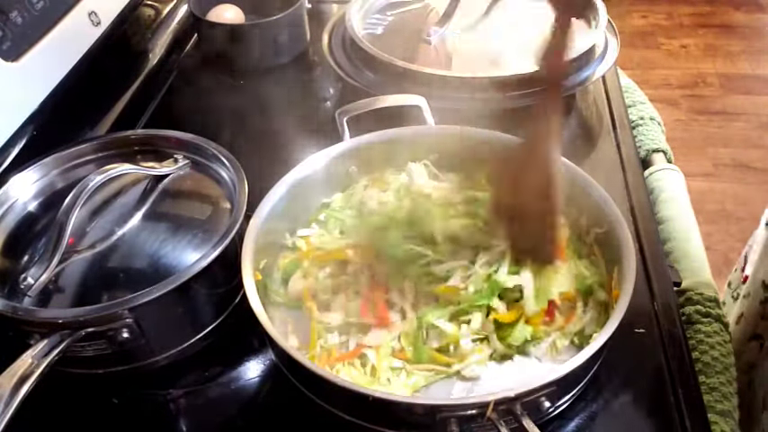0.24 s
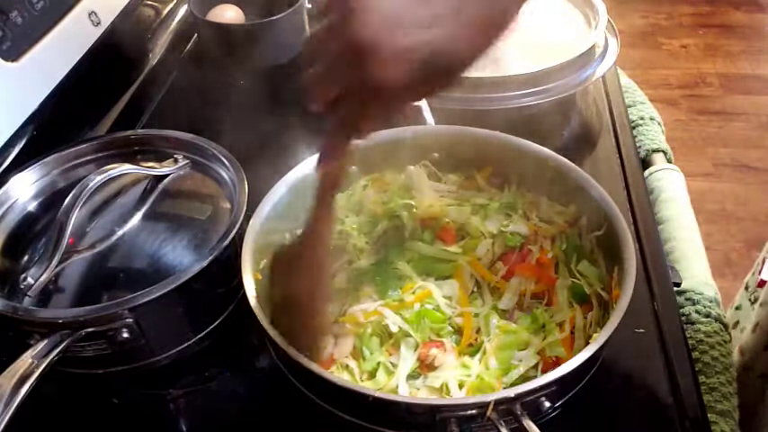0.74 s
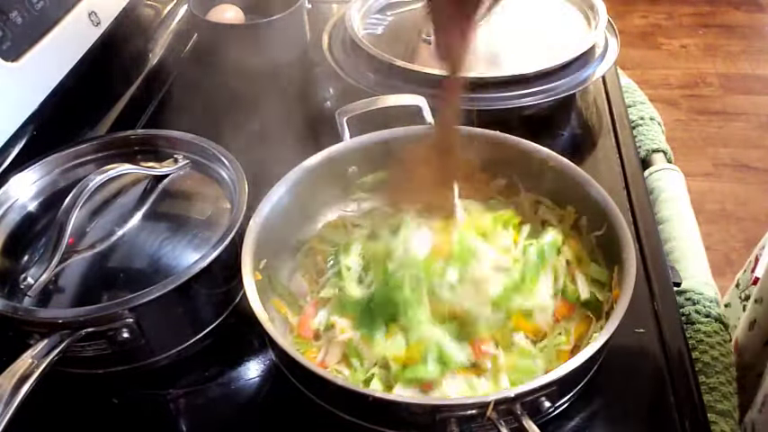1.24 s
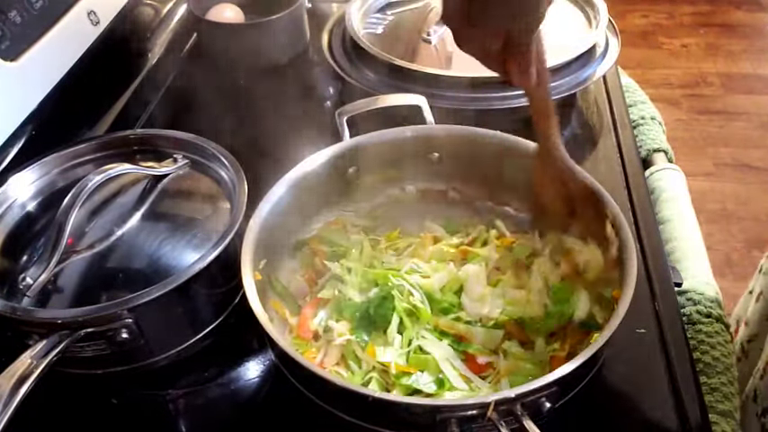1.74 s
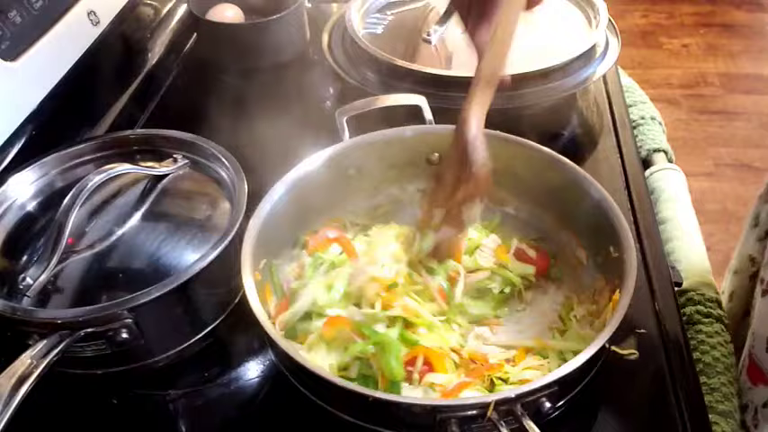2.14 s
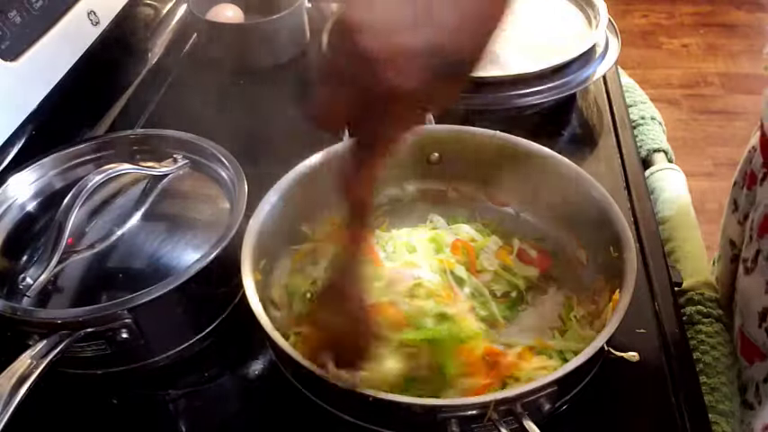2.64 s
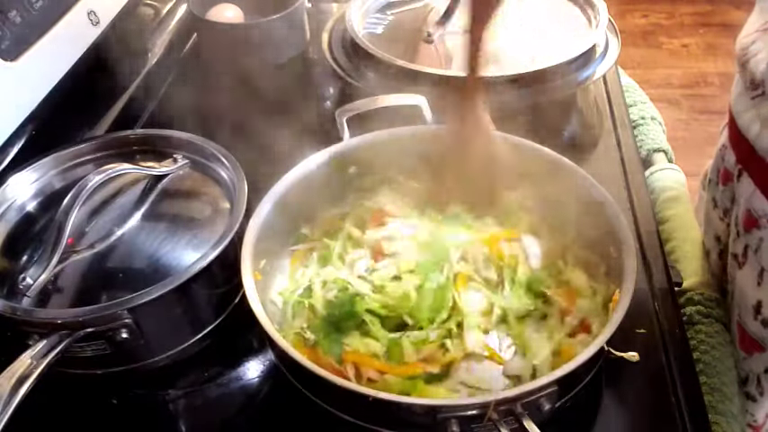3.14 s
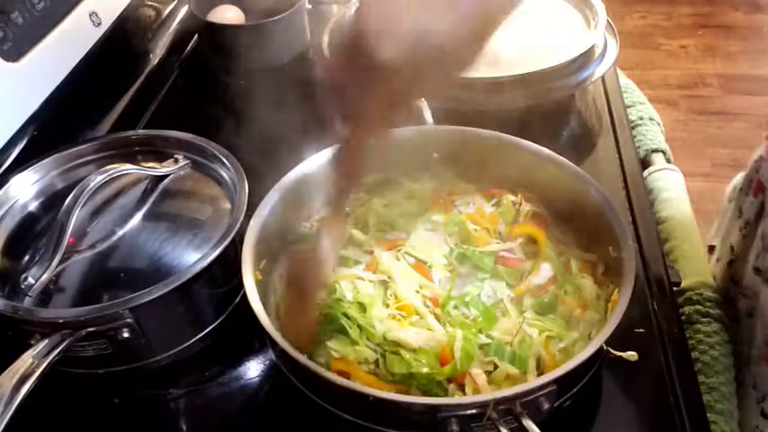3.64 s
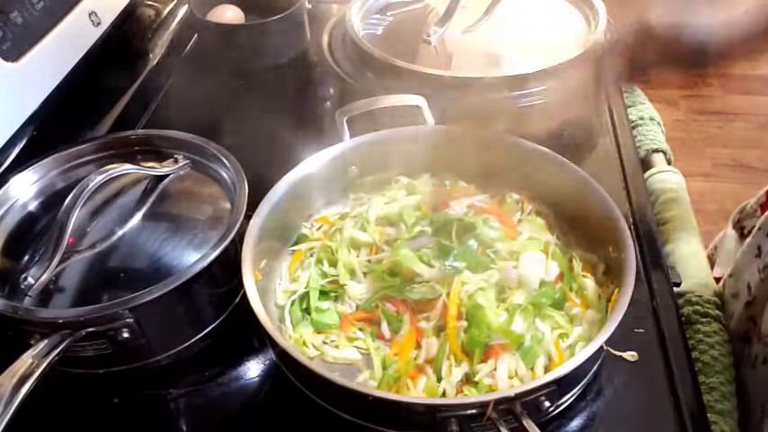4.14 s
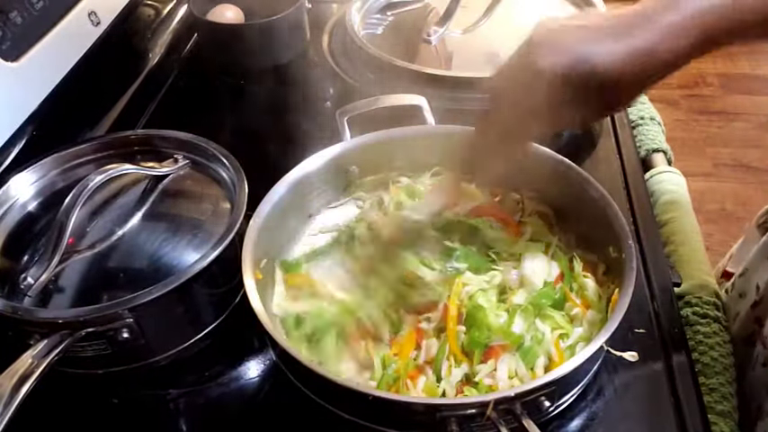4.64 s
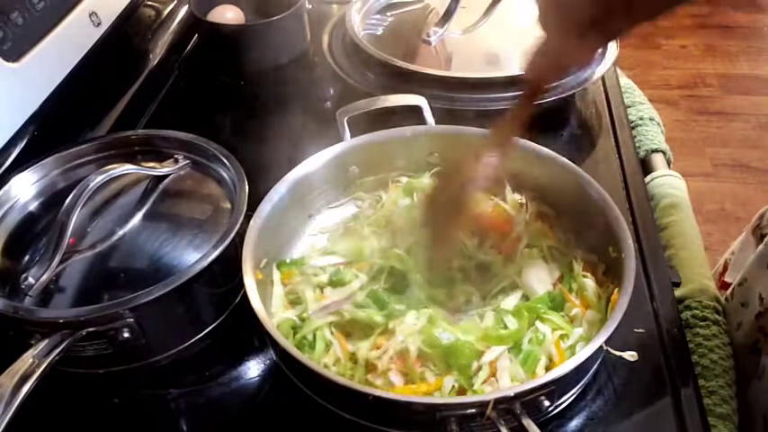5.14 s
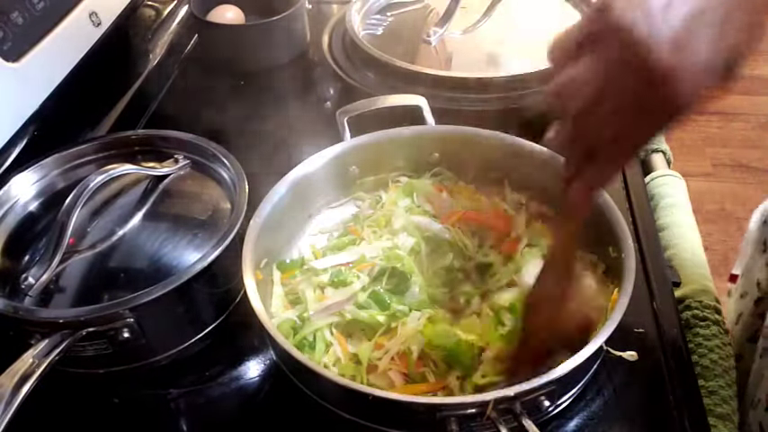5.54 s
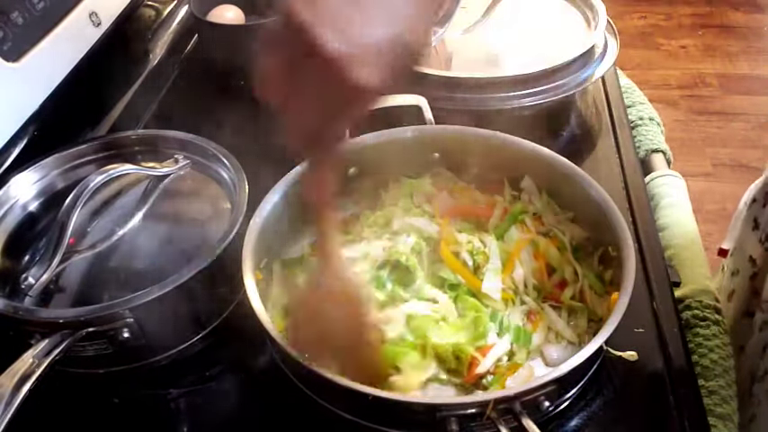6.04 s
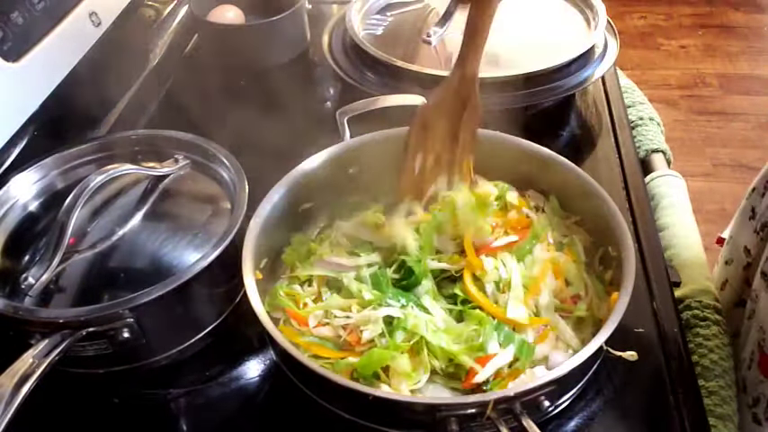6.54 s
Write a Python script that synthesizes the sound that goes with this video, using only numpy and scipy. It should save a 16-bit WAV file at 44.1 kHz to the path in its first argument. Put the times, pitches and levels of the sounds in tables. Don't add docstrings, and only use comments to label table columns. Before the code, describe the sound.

Irregular wood-on-metal clacks and soft thuds, short scrapes and steady moist sizzle over hood rumble, with one loud ringing rim strike past midway.

```python
import sys
import numpy as np
from scipy import signal
from scipy.fft import rfft, irfft, next_fast_len
from scipy.io import wavfile
from scipy.ndimage import uniform_filter1d

SR = 44100
rng = np.random.default_rng(int(sys.argv[2]) if len(sys.argv) > 2 else 0)


def dump_mix(stems):
    frames = np.atleast_2d(stems).T
    limited = np.clip(frames, -1, 1)
    pcm = np.round(limited * 32767).astype(np.int16)
    wavfile.write(sys.argv[1], SR, pcm)


def invert_db(x):
    u = np.asarray(x, float) / 20
    return 10 ** u


N = 299241

# pitch_hz [Hz], level_db [dB], t60_s [s]
WALL = [(209.7, 1.5, 0.2), (353, -18.5, 0.13), (522, -26, 0.78), (576, -25, 0.4), (843, -15, 0.18),
        (878, -12.5, 0.27), (1111, -23, 0.33), (1468, -16.5, 0.29), (1520, -25.5, 0.83), (1810, -33, 0.27),
        (2030, -24.5, 0.32), (2440, -27.5, 0.17), (3200, -33.5, 0.12), (2930, -22, 0.13)]
# pitch_hz [Hz], level_db [dB], t60_s [s]
LOW_WALL = [(210.6, -4, 0.23), (343.4, -18, 0.24), (521, -25.5, 0.48), (774, -31, .3), (1505, -29, 0.7),
            (2010, -29, 0.23), (2455, -26, 0.1), (2670, -24, 0.25), (3050, -34.5, 0.15)]
# pitch_hz [Hz], level_db [dB], t60_s [s]
RIM = [(217, -1.5, 0.17), (259, -24, 0.71), (952, -20, 0.31), (322, -16, 0.2), (499, -25, 0.68),
       (654, -24, 0.31), (878, -19, 0.33), (1493, -3, 0.12), (1125, -13, 0.39), (1350, -8.5, 0.25),
       (1503, -9.5, 0.69), (2440, -17.5, 0.23), (2547, -16, 0.62), (2630, -20, 0.47)]
# pitch_hz [Hz], width_hz [Hz], level_db [dB]
SHAFT = [(696, 40, 7.5), (1130, 60, 2), (2100, 60, 4), (2660, 49, 6.5), (3550, 39, -39), (4000, 28, -27),
         (4300, 76, -29), (5600, 240, 14)]


def along(table, hz):
    t = np.array(table, float)
    return np.interp(np.log(np.maximum(hz, 1)), np.log(t[:, 0]), t[:, 1])


def unit(x):
    return x / np.sqrt(np.mean(x ** 2))


def colour(x, table):
    n = next_fast_len(x.shape[-1])
    gain = invert_db(along(table, np.fft.rfftfreq(n, 1 / SR)))
    return irfft(rfft(x, n) * gain, n)[..., :x.shape[-1]]


def causal(x, table):
    n = 2 * next_fast_len(len(x) // 2 + 1)
    cepstrum = irfft(np.log(invert_db(along(table, np.fft.rfftfreq(n, 1 / SR)))), n)
    cepstrum[1:n // 2] *= 2
    cepstrum[n // 2 + 1:] = 0
    return irfft(rfft(x, n) * np.exp(rfft(cepstrum)), n)[:len(x)]


def band(hz, octaves):
    near, far = 2 ** octaves, 4 ** octaves
    return [(hz / far, -80), (hz / near, -20), (hz, 0), (hz * near, -20), (hz * far, -80)]


def diffuse(mid, side):
    side_rows = [(60, -38), (110, -28), (200, -12), (380, -12), (700, -3), (1290, 0), (2380, -0.5),
                 (4400, 1.5), (8120, 0), (15000, -0.5)]
    left_rows = [(60, 9.5), (110, -3), (200, 3.5), (380, 2.5), (700, 2), (1290, 1.5), (2380, 3),
                 (4400, 4.5), (8120, 2.5), (15000, -0.5)]
    side = colour(side, side_rows)
    lean = np.array(left_rows) * [1, .5]
    return np.array([colour(mid + side, lean), colour(mid - side, lean * [1, -1])])


def walk(rate):
    hold = int(SR / rate)
    levels = np.repeat(rng.standard_normal(N // hold + 1), hold)
    return unit(uniform_filter1d(uniform_filter1d(levels, hold), hold)[:N])


def add(track, sound, s):
    i = int(s * SR)
    track[..., i:i + sound.shape[-1]] += sound[..., :N - i]


def tails(table, t):
    out = 0
    for hz, db, t60 in table:
        noise = colour(rng.standard_normal(len(t)), band(hz, 2.42))
        out = out + invert_db(db - 60 * t / t60) * unit(noise)
    return out


def grains(rate, spread_db, bed, size=N):
    sizes = invert_db(spread_db * np.minimum(rng.exponential(size=(2, size)), 3))
    drops = sizes * (rng.random((2, size)) < rate / SR)
    burst = signal.lfilter([1], [1, -.96], drops)
    return rng.standard_normal((2, size)) * (bed + unit(burst))


def gain_db(t):
    duck_s, duck_db, recover_db_per_s = 4.27, -7.5, 1.37
    return np.where(t < duck_s, 0, np.minimum(duck_db + recover_db_per_s * (t - duck_s), 0))


def hood(t):
    # pitch_hz [Hz], level_db [dB per Hz]
    air_rows = [(35, -69), (60, 3), (80, -15), (100, -3.5), (121, -6), (145, -0.5), (173, -2), (291, -3),
                (334, -8.5), (368, -6.5), (519, -6), (579, -16), (620, -13.5), (1320, -28.5), (1600, -29),
                (2080, -47), (3520, -120)]
    # pitch_hz [Hz], level_db [dB], width_hz [Hz]
    hum = [(41, 0, 0.16), (121, 1, 7.29), (386.3, -8, 7.14)]
    air = diffuse(*colour(rng.standard_normal((2, N)), air_rows))
    lines = 0
    for hz, db, width in hum:
        phase = 2 * np.pi * np.cumsum(hz + width * walk(8.1)) / SR
        lines = lines + invert_db(db) * np.sin(phase)
    return invert_db(-57 + gain_db(t)) * (invert_db(6.5) * unit(air) + invert_db(3.0) * lines)


def strokes_db(t):
    # start_s [s], length_s [s], level_db [dB]
    strokes = [
        (0.045, 0.72, -53.5),
        (1.01, 0.054, -38),
        (1.62, 0.088, -42),
        (2.814, 0.22, -53),
        (3.235, 0.042, -55),
        (4.392, 0.27, -36),
        (6.014, 0.053, -46.5),
        (6.433, 0.045, -40),
    ]
    attack_s, fade_db_per_s, rest_db = 0.15, 70, -58.5
    power = invert_db(2 * rest_db)
    for s, length, db in strokes:
        fade = fade_db_per_s * np.maximum(t - s - length, 0)
        swell = np.clip((t - s) / attack_s + 1, 0, 1)
        power = power + (swell * invert_db(db - fade)) ** 2
    return 10 * np.log10(power)


def food(t):
    # start_s [s], level_db [dB]
    bare_rows = [(0, -0.5), (.4, 2), (.85, -2.5), (1.02, 5.5), (1.2, 4.5), (1.33, -1.5), (1.6, -1.5),
                 (2.0, -1.5), (2.6, 1.5), (3.3, 0), (3.5, -4.5), (3.9, 1.5), (4.3, -1.5), (4.7, 3),
                 (5.2, 0.5), (5.6, 2), (6.1, 2.5), (6.79, 5.5)]
    # pitch_hz [Hz], level_db [dB per Hz]
    sizzle_rows = [(710, -44), (1200, 4), (1380, -5), (1650, 4.5), (2680, 1.5), (3930, 2), (7600, -1),
                   (8500, -29)]
    # pitch_hz [Hz], level_db [dB per Hz]
    steam_rows = [(6000, -8), (8000, -1), (9200, -6), (12000, -2), (15400, -4.5), (16000, -3)]
    bare_db = np.interp(t, *np.transpose(bare_rows))
    slips = grains(300, 1.7, 0.43)
    drag = colour(slips, [(300, -19), (600, 1.0), (850, 20.0), (1050, 6.0), (1500, 6.0), (2200, -20.0)])
    sizzle = colour(grains(300, 4.5, 4.2), sizzle_rows)
    steam = colour(grains(800, 3.0, 5.0), steam_rows)
    layers = [(drag, strokes_db(t) - 12.5), (sizzle, -57.5 + bare_db), (steam, -58.5 + bare_db)]
    out = 0
    for sound, db in layers:
        out = out + invert_db(db + .6 * walk(12)) * unit(diffuse(*sound))
    return invert_db(gain_db(t)) * out


def splashes():
    # start_s [s] (at the peak), level_db [dB], half_length_s [s], pitch_hz [Hz]
    slaps = [(0.422, -58, .04, 9000), (0.43, -56, 0.083, 730), (0.589, -59, 0.018, 4300),
             (0.66, -61, 0.027, 11100), (0.85, -56, 0.08, 12900), (0.87, -43, 0.017, 10000),
             (0.91, -59, .05, 9500), (0.963, -54, .018, 10500), (1.16, -57, .042, 7000),
             (2.01, -58.5, 0.1, 1580), (2.3, -63.5, 0.4, 12400), (2.59, -59, 0.1, 2050),
             (3.0, -55.5, 0.094, 1500), (3.277, -50, 0.044, 1950), (3.281, -60, .045, 5000),
             (3.552, -59, 0.2, 8200), (3.709, -48, 0.017, 12000), (3.745, -56.5, .042, 11500),
             (4.656, -60, .026, 13600), (4.86, -72, .11, 11600), (5.04, -59.5, 0.07, 796),
             (5.044, -61.5, 0.072, 1800), (5.199, -66.5, .15, 11600), (6.2, -65.5, 0.045, 8800),
             (5.8, -64, 0.6, 12100)]
    out, t = np.zeros((2, N)), np.arange(SR // 2) / SR - 1 / 4
    for s, db, length, hz in slaps:
        fizz = colour(grains(1500, 2.5, 3.2, size=len(t)), band(hz, 2.44))
        add(out, invert_db(db) * np.exp(-(t / length) ** 2) * unit(diffuse(*fizz)), s + t[0])
    return out


def ticks():
    # start_s [s], level_db [dB], pitch_hz [Hz], t60_s [s]
    snaps = [(0.8258, -30, 11500, .03), (0.951, -60, 9000, .015), (0.965, -52, 3500, .018),
             (1.0287, -39.5, 4800, 0.023), (1.04, -40, 5000, .02), (0.963, -40, 800, 0.032),
             (1.125, -48, 5000, .02), (1.15, -45, 7000, .02), (4.27, -54, 11000, 0.032),
             (4.293, -36.5, 14000, 0.065), (5.4665, -59, 5000, 0.018), (6.4016, -43, 5400, .015),
             (6.516, -49, 3500, .015), (3.696, -48, 9020, .02)]
    out, t = np.zeros((2, N)), np.arange(SR // 10) / SR
    for s, db, hz, t60 in snaps:
        snap = unit(diffuse(*colour(rng.standard_normal((2, len(t))), band(hz, 2.4))))
        add(out, invert_db(db - 60 * t / t60) * snap, s)
    return out


def ring(modes, t, scatter_db, detune, split=0., rough=0.):
    hold_s, port_lag_s = 0.01097, 0.00011
    hz, db, t60 = np.array(modes, float).T[:, :, None]
    chance = rng.standard_normal((4, len(modes), 1))
    out = np.zeros((2, len(t)))
    t = t[t < 1.5 * t60.max()]
    steps = rng.standard_normal((2, len(modes), 128))
    k = (t / hold_s).astype(int)
    glide = steps[..., k] + (steps[..., k + 1] - steps[..., k]) * (t / hold_s - k)
    shift = glide * rough * np.minimum((hz / 2200) ** 2, 1.3)
    turn = 2 * np.pi * hz * (1 + detune * chance[1]) * t + shift[0] - shift[0, :, :1]
    skew = 2 * np.pi * hz * port_lag_s * (1 + chance[2] / 8) / 2
    skew = skew + 0.52 * np.exp(-np.log(hz / 1300) ** 2 / 0.2)
    swell = 1 - np.exp(-t / (0.53 / hz + 0.027 * (abs(hz - 215) < 20)))
    decay_db = 60 * np.clip(t / np.minimum(t60, .9), 0, 9)
    size = invert_db(db + scatter_db * chance[0] + 6.6 * shift[1] - decay_db) * swell
    twin = turn * (1 + split * (1 + 0.458 * chance[3]))
    for port, way in enumerate((1, -1)):
        pair = np.sin(turn + way * skew) + 0.51 * np.sin(twin - way * skew)
        out[port, :len(t)] = np.sum(size * pair, axis=0)
    return out


def thuds():
    # start_s [s], level_db [dB], pitch_hz [Hz], t60_s [s], pan_ring_db [dB]
    blows = [(.385, -40, 110, 0.15, -3.5), (.408, -36, 108, 0.045, -1), (.428, -28.5, 116, 0.062, -8),
             (0.962, -33, 159, 0.06, -20), (1.039, -34.5, 87.5, 0.16, -40), (1.116, -24, 113, 0.068, -12),
             (1.116, -31, 394, 0.067, -5), (1.139, -26, 100, 0.07, -24), (1.62, -39.5, 106, 0.1, -9),
             (2.549, -29, 144, 0.064, -18.5), (3.273, -35, 121, 0.087, -9), (3.3, -35, 134, 0.034, -32),
             (3.70, -38, 209, 0.14, -14), (4.594, -19, 144, 0.04, -30), (4.625, -40.5, 121, 0.3, -43),
             (6.298, -39.5, 169, 0.083, -24)]
    out, t = np.zeros((2, N)), np.arange(SR // 2) / SR
    for s, db, hz, t60, ring_db in blows:
        boom = ring([(hz, 0, t60), (hz * 1.49, -8, t60), (hz * 1.17, -12, t60)], t, 2.25, 0.087)
        dull = colour(ring(WALL, t, 4.7, 0.0034), [(250, -13), (380, 4.5), (900, -8.5), (2500, -25)])
        add(out, invert_db(db) * (boom + invert_db(ring_db) * dull) * np.minimum(t / 0.00086, 1), s)
    return out


def knocks(hits, steel, wood, steel_db, wood_db, glass_db, clatter_db, tick_db, thud_db):
    # pitch_hz [Hz], level_db [dB], t60_s [s]
    cooktop = [(122, 0, .19), (80, -15, .08), (100, -12, .1), (148, -9, .15), (256, -11, .15)]
    # pitch_hz [Hz], level_db [dB], t60_s [s]
    clatter_rows = [(100, 9.5, 0.32), (246, 0.5, 0.13), (704, -6, 0.26), (1800, 5.5, 0.13),
                    (5600, 1, 0.045), (12000, -42, 0.3)]
    out, t = np.zeros((2, N)), np.arange(SR) / SR
    spoon = [(hz, db, min(np.log(1000) / (np.pi * width), .035)) for hz, width, db in wood]
    tick = np.sin(2 * np.pi * 3200 * t) * np.exp(-t / 0.000072)
    for s, db, bottom, upper, crack in hits:
        clatter = diffuse(tails(clatter_rows, t), tails(clatter_rows, t))
        clatter *= np.minimum(t / 0.00035, 1) * (t < 4 / 5)
        blow = invert_db(steel_db) * ring(steel, t, 0.2, 0.00246, split=0.0132, rough=1.0)
        blow += invert_db(wood_db) * ring(spoon, t, 0.24, 0.0039, split=0.0052)
        blow += invert_db(glass_db) * ring(cooktop, t, 0.35, 0)
        blow += invert_db(tick_db) * tick + invert_db(clatter_db) * clatter
        tone = [(45, thud_db - 20), (90, thud_db), (130, thud_db), (230, bottom), (600, 0),
                (1800, upper), (4500, crack)]
        add(out, invert_db(db) * np.array([causal(port, tone) for port in blow]), s)
    return out




def dull_blows():
    hits = [(6.3878, -33, -2.1, 1, -33), (6.4035, -38, -1.2, 0, -3)]
    wood = [(1120, 200, -1), (1350, 160, 2.5), (1560, 160, 6), (1800, 230, -7), (2370, 170, -12),
            (3510, 200, -14)]
    # pitch_hz [Hz], level_db [dB], t60_s [s]
    steel = [(204, 0, 0.25), (250, -4.5, .14), (530, -9, 0.12), (877, -5, .2), (1362, -8.5, .2),
             (1497, -9, 0.2), (1995, -17, 0.23), (2400, -20, .18)]
    return knocks(hits, steel, wood, steel_db=-3.0, wood_db=1.9, glass_db=1.6,
                  clatter_db=-13.5, tick_db=15.0, thud_db=-26)


def scoop_blows():
    hits = [(5.4555, -40.5, 10.5, -0.78, 2.3), (5.4665, -44, 3.3, 0, 3.6)]
    wood = [(595, 43, 1.5), (890, 60, -3), (1256, 50, -0.5), (2070, 110, 6.5), (2350, 190, 9.5),
            (2850, 110, 2), (3500, 120, 7), (4940, 340, 10), (7270, 460, -5)]
    return knocks(hits, LOW_WALL, wood, steel_db=0.0, wood_db=6.3, glass_db=2.3,
                  clatter_db=-11.5, tick_db=5.7, thud_db=-18)


def lip_blows():
    hits = [(5.908, -30.5, 0.39, -4, 0.96)]
    wood = [(364, 40, -7), (660, 56, -6.5), (1870, 150, -7), (2510, 59, -4), (3160, 156, 6),
            (4070, 250, -10), (5340, 130, 2), (7530, 230, -3.5)]
    return knocks(hits, LOW_WALL, wood, steel_db=13.5, wood_db=5.3, glass_db=0.74,
                  clatter_db=-7.0, tick_db=5.4, thud_db=-23)


def bowl_blows():
    hits = [(3.685, -36.5, 0.5, -7, -4)]
    wood = [(634, 59, 1), (1490, 69, -2), (1940, 120, -14), (2990, 240, 10), (5400, 310, 3), (7260, 550, 0)]
    return knocks(hits, LOW_WALL, wood, steel_db=1.4, wood_db=2.4, glass_db=1.2,
                  clatter_db=-9.0, tick_db=6.5, thud_db=-31.5)


def edge_blows():
    hits = [(0.826, -24, -2.5, -6, 0.73)]
    wood = [(643, 73, -10), (1345, 66, -4.5), (1950, 126, -1.5), (2530, 360, 4), (3140, 100, -5),
            (4580, 240, -3), (5560, 270, 5.5), (7000, 540, -0.5), (7600, 310, -5)]
    return knocks(hits, LOW_WALL, wood, steel_db=2.4, wood_db=8.2, glass_db=1.2,
                  clatter_db=-11.0, tick_db=13.0, thud_db=-23)


def flat_blows():
    hits = [(1.0287, -27, -2.5, -2, -22), (6.296, -45.5, -15, -5, -6)]
    wood = [(394, 50, 2), (867, 60, -20), (1210, 280, 2.5), (1545, 200, 9), (1840, 160, -4),
            (3580, 400, -8)]
    return knocks(hits, WALL, wood, steel_db=2.9, wood_db=6.0, glass_db=1.1,
                  clatter_db=-9.5, tick_db=9.9, thud_db=-30)


def tip_blows():
    hits = [(1.5053, -19, -4.5, -3.5, -1.1)]
    wood = [(597, 47, -1), (870, 36, -11), (1580, 52, -1), (1842, 46, 6), (2014, 62, 6), (3900, 1300, -32),
            (5730, 650, 7), (7300, 400, -1.5)]
    return knocks(hits, WALL, wood, steel_db=6.8, wood_db=2.1, glass_db=0.33,
                  clatter_db=-13.0, tick_db=3.0, thud_db=-23.0)


def handle_blows():
    hits = [(4.593, -25, -13.5, -20.5, -17.5)]
    wood = [(432, 91, 6), (690, 380, 10), (1027, 110, 11), (1280, 120, 15.5), (2860, 160, -5),
            (4130, 330, 14)]
    return knocks(hits, RIM, wood, steel_db=-20.0, wood_db=3.9, glass_db=1.7,
                  clatter_db=-7.5, tick_db=16.0, thud_db=-14.0)


def rim_blows():
    hits = [(4.2612, -13.5, 0.17, -4.5, -10)]
    bounces = [(4.2695, -19, -6, -6, -6)]
    strike = knocks(hits, RIM, SHAFT, steel_db=1.6, wood_db=-18.0, glass_db=7.7,
                    clatter_db=-7.0, tick_db=3.2, thud_db=-9.5)
    return strike + knocks(bounces, RIM, SHAFT, steel_db=-1.1, wood_db=-2.5, glass_db=6.5,
                           clatter_db=-6.5, tick_db=4.2, thud_db=-7.5)


def kitchen(x, wet_db):
    # pitch_hz [Hz], t60_s [s]
    room = [(100, 0.21), (400, 0.56), (1500, 0.62), (5000, 0.63), (12000, 0.57)]
    # pitch_hz [Hz], level_db [dB]
    room_tone = [(100, 0.5), (220, -10.5), (500, -1), (3000, -1.5), (8000, -2)]
    # pitch_hz [Hz], left minus right level_db [dB]
    pan_left = [(100, 1.5), (300, -1), (700, 4.5), (2500, 1.5), (6000, 5), (12000, -1)]
    t = np.arange(SR) / SR
    walls = [(hz, 0, t60) for hz, t60 in room]
    echo = diffuse(tails(walls, t), tails(walls, t)) * np.clip((t - .003) / 0.003, 0, 1)
    echo *= t < .8
    spectrum = rfft(echo)
    smooth = np.sqrt(uniform_filter1d(abs(spectrum) ** 2, size=60))
    echo = irfft(spectrum / smooth, SR) * (t < 4 / 5)
    echo /= np.sqrt(np.sum(echo ** 2) / 2)
    lean = np.array(pan_left) * [1, .5]
    direct = np.array([causal(x[0], lean), causal(x[1], lean * [1, -1])])
    answer = signal.fftconvolve(causal(x[0], room_tone)[None], echo, axes=1)[:, :N]
    return direct + invert_db(wet_db) * answer


def scene():
    t = np.arange(N) / SR
    spoon = dull_blows() + scoop_blows() + lip_blows() + bowl_blows() + edge_blows()
    spoon += flat_blows() + tip_blows() + handle_blows() + rim_blows()
    return hood(t) + food(t) + splashes() + kitchen(spoon + ticks() + thuds(), -7.5)


def roll_off(x):
    return signal.sosfilt(signal.butter(12, 16630, fs=SR, output="sos"), x)


def record(dry):
    x = np.tanh(0.5 * dry) / 0.52
    x = signal.sosfilt(signal.butter(6, 36, "high", fs=SR, output="sos"), x)
    x = .94 * np.tanh(x / .94 + (x / .94) ** 3 / 3)
    x = signal.sosfilt(signal.ellip(8, .2, 60, 15450, fs=SR, output="sos"), x)
    return roll_off(x)


dry = scene()
out = record(dry)
dump_mix(out)
```